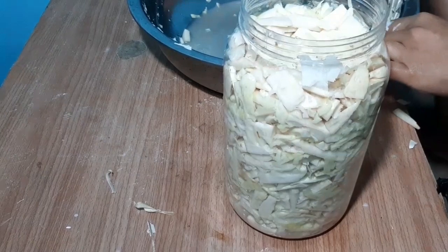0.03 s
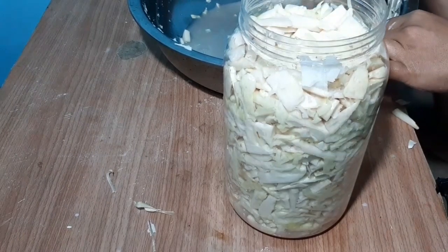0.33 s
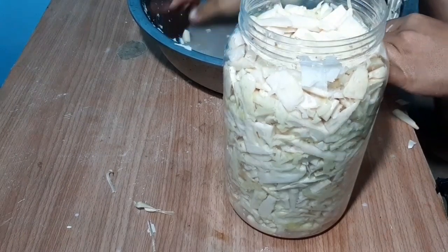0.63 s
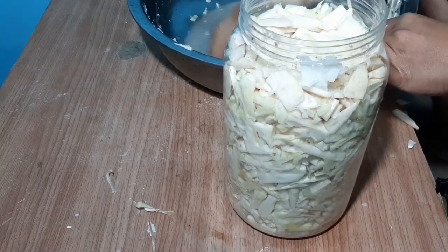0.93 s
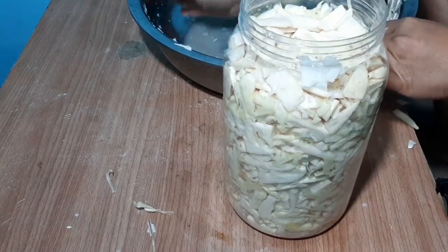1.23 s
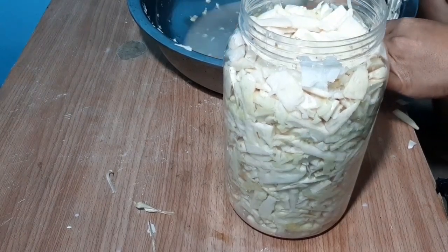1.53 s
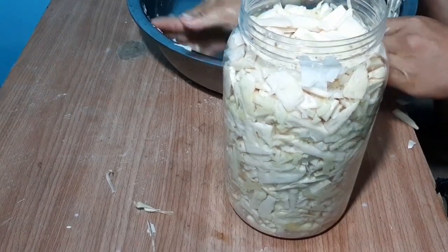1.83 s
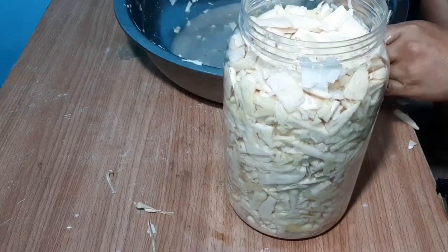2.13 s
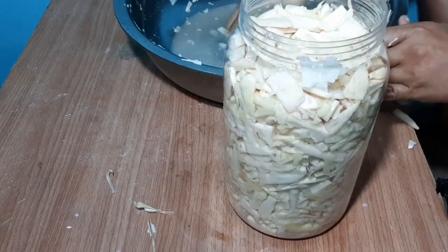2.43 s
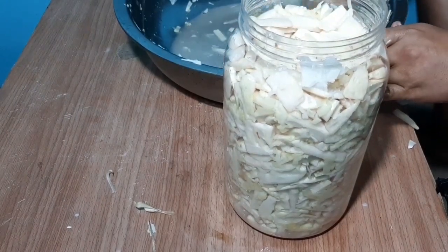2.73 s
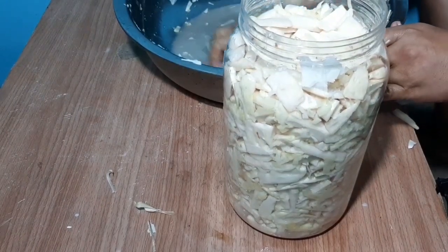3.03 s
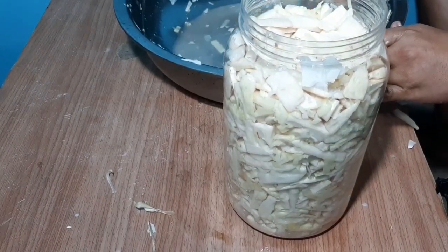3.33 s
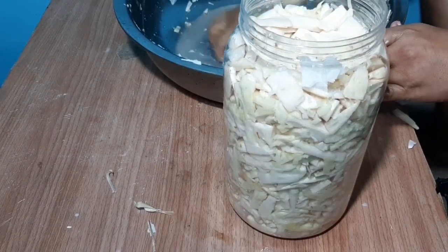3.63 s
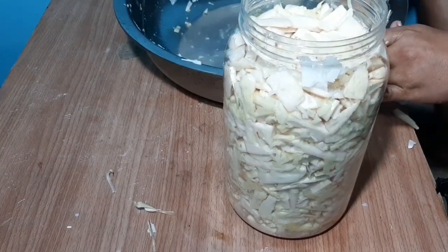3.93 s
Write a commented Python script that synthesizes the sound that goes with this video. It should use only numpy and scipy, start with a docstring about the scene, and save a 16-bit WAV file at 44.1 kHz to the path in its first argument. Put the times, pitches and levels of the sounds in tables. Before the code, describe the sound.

A wet hand sweeps shredded bamboo shoots around a plastic basin in short, raspy strokes with faint squeaks and crackles. Midway the basin knocks once on a wooden table, then rubbing and finger taps continue, close by in a small kitchen.

```python
"""A wet hand sweeps shredded bamboo shoots together in a plastic basin.
The strokes rasp as the shreds slip and tiny air pockets pop; wet skin sticks and slips on the plastic
and half squeaks. Shreds snap and drip, fingers bump the basin, and once it knocks on the wooden table.
Behind it all is a small kitchen with a short echo and a low hum."""
import sys
import numpy as np
from scipy import signal
from scipy.fft import rfft, irfft
from scipy.io import wavfile

SR = 44100
rng = np.random.default_rng(int(sys.argv[2]) if len(sys.argv) > 2 else 0)


def int16_out(signal):
    """Quantize to a 16-bit WAV file."""
    q = np.round(np.clip(np.atleast_2d(signal).T, -1, 1) * 32767)
    wavfile.write(sys.argv[1], SR, q.astype(np.int16))


N = 176400
T = np.arange(N) / SR


def hand_strokes():
    """Wet shreds dragged over the basin: many tiny slips and pops blend into a shaky rasp."""
    # one sweep a row: start/s, length/s, level/dB, rise/s, fade/s, drop over the length/dB,
    # low edge/Hz, brightness/(dB per octave)
    sweeps = [(0.081, 0.1, -31.5, 0.076, 0.041, 3.5, 1800, 3),
              (0.221, 0.075, -29, 0.057, 0.065, 4, 1450, -1), (0.617, 0.093, -51, 0.027, .03, 2, 3600, 1),
              (0.726, 0.2, -31.5, 0.094, 0.012, 4, 1760, 2), (0.918, 0.052, -41, 0.014, .03, 7, 900, -4.5),
              (1.258, 0.19, -53, 0.028, 0.027, -0.5, 2800, -0.5),
              (1.418, .15, -44.5, 0.034, .04, 4.5, 2500, 1.5),
              (1.59, 0.081, -50, 0.045, 0.0063, -4.5, 2800, -2),
              (1.896, 0.14, -31, 0.15, 0.01, 1, 1190, -1), (2.023, 0.11, -34, 0.0095, 0.047, 0.5, 690, -2),
              (2.176, 0.17, -42.5, 0.099, 0.012, 6, 1500, 0.5),
              (2.569, 0.17, -37, 0.079, 0.086, 6, 350, -1), (3.051, 0.24, -32.5, .06, 0.081, 5, 1080, -2.5),
              (3.627, 0.18, -30, .1, 0.12, 9.5, 1300, -2), (3.815, 0.045, -42, 0.028, 0.05, -4, 500, -2),
              (3.903, 0.11, -36.5, 0.092, .03, 4.5, 550, -1.5)]
    # tone colour of the rubbing: f/Hz, level/dB
    rasp_colour = [(200, -32), (600, 8.5), (1000, -5), (1600, 1.5), (2200, -2.5), (3200, -1), (4000, 1),
                   (4900, 0.5), (7000, -6), (9000, -10.5), (13000, -16), (14000, -18), (16000, -23)]
    slips = rms_one(random_clicks(per_s=3500, spread_db=-1, max_spreads=4))
    rasp = rms_one(flicker(slips + 0.84 * rng.standard_normal(N)))
    judder = from_db(1.4 * drift(rate_hz=51))
    friction = (rasp + 0.3 * air_pockets()) * judder
    out = np.zeros(N)
    for start, length, db, rise, fade, drop_db, edge_hz, tilt_db in sweeps:
        t = T - start
        swell = np.sin(np.pi / 2 * np.clip(t / rise, 0, 1)) ** 2
        release = np.exp(-np.maximum(t - length, 0) / fade)
        level = from_db(db - drop_db * np.clip(t / length, 0, 1))
        rub = rms_one(butter(coloured(friction, rasp_colour, tilt_db), edge_hz, "high"))
        out += swell * release * level * rub
    return out


def air_pockets():
    """Tiny air pockets pop between the wet shreds, each ringing briefly at its own pitch."""
    pitches_hz = np.geomspace(1108, 9020, num=48)
    ring_cycles = 138  # swings until a pop has faded by 60 dB
    pops = random_clicks(per_s=900, spread_db=4.5, max_spreads=3)
    pitch_of_pop = rng.integers(0, len(pitches_hz), N)
    out = np.zeros(N)
    for k, hz in enumerate(pitches_hz):
        fade = from_db(-60 * hz / (ring_cycles * SR))
        turn = 2 * np.pi * hz / SR
        ring_filter = [turn, 0, -turn], [1, -2 * fade * np.cos(turn), fade * fade]
        out += signal.lfilter(*ring_filter, pops * (pitch_of_pop == k) + 1e-18)
    return rms_one(out)


def skin_squeaks():
    """Wet skin sticks and slips on the plastic: hoarse, sliding tones with two overtones."""
    # one squeak a row: start/s, length/s, first pitch/Hz, last pitch/Hz, level/dB,
    # hoarse width/Hz, change per overtone/dB
    squeaks = [(0.16, 0.05, 1950, 1872, -34, 90, -16), (0.161, 0.088, 1780, 1694, -42.5, 50, 1),
               (0.259, 0.1, 1600, 1568, -41, 60, -2), (0.759, 0.035, 2390, 2674, -32, 39.7, -5),
               (0.829, 0.091, 1720, 1704, -49, 69.6, 0.5), (0.881, 0.044, 3480, 3460, -36, 110, -10),
               (0.981, 0.032, 1650, 2140, -44.5, 60, -7.5), (1.656, 0.021, 3690, 3600, -41, 131, -10),
               (2.305, 0.029, 3400, 3265, -37.5, 198, -3), (3.094, 0.036, 1320, 1316, -29.5, 60.3, -8),
               (3.113, .11, 1704, 1506, -37.5, 70, -2.5), (3.198, .09, 1480, 1415, -43, 70, -0.5),
               (3.709, 0.028, 1640, 1643, -29.5, 70, -3), (3.689, 0.096, 1474, 1434, -42, 60, 2),
               (3.747, 0.079, 1680, 1409, -36, 80, -1.5)]
    out = np.zeros(N)
    for start, length, first_hz, last_hz, db, width_hz, overtone_db in squeaks:
        progress = np.linspace(0, 1, int(length * SR))
        phase = 2 * np.pi * np.cumsum(first_hz + (last_hz - first_hz) * progress) / SR
        for k in (1, 2, 3):
            # slow noise shakes the tone and makes it hoarse
            shake = butter(rng.standard_normal((2, SR // 2)), width_hz * np.sqrt(k), "low")
            shake = shake[:, SR // 8:SR // 8 + len(progress)]
            tone = rms_one(shake[0] * np.cos(k * phase) + shake[1] * np.sin(k * phase))
            add(out, start, from_db(db + (k - 1) * overtone_db) * np.sin(np.pi * progress) * tone)
    return butter(out, 5000, "low")


def shred_snaps():
    """Shreds snap and drip: each is a very short wet crackle with one ringing pitch."""
    # one snap a row: t/s, level/dB, ring pitch/Hz, ring strength/ratio, low edge/Hz, fade/s
    snaps = [(0.05, -39.5, 4450, .6, 3620, 0.018), (0.182, -31, 3480, 1.2, 1700, 0.0099),
             (0.301, -30.5, 3080, 1.1, 2000, .004), (0.395, -32.5, 4840, 2.1, 3750, 0.0072),
             (0.397, -35.5, 2210, 3.2, 7000, 0.0052), (0.613, -39, 4100, 1.05, 3670, 0.013),
             (0.671, -39.5, 5000, 0.9, 3730, 0.018), (0.698, -44.5, 3830, 1.2, 3500, .008),
             (0.756, -39.5, 5000, 1.6, 3200, .008), (0.851, -30.5, 4900, 1.2, 3500, 0.011),
             (1.455, -30.5, 4800, 1.34, 1990, 0.0056), (1.458, -38, 2030, 2.3, 1500, .006),
             (1.602, -43.5, 4050, 1.8, 2980, 0.0059), (2.27, -36.5, 3660, 0.57, 600, 0.003),
             (2.317, -35, 3300, 0.54, 3400, 0.0068), (2.398, -43, 1730, 1.1, 400, 0.0051),
             (2.569, -44.5, 1490, 1.8, 400, 0.011), (2.596, -49, 6260, 1.3, 4000, 0.0042),
             (2.654, -44, 5000, 1.2, 3000, 0.0032), (2.694, -32.5, 1650, 0.59, 500, 0.013),
             (2.727, -36.5, 2520, 1.15, 1200, 0.007), (2.738, -28, 1610, 0.26, 1200, 0.0042),
             (2.779, -39, 4500, 1.1, 3000, 0.011), (3.082, -33.5, 3100, 0.7, 1490, 0.012),
             (3.178, -36.5, 3340, 2.2, 2500, 0.0037), (3.228, -25.5, 4760, 0.85, 700, 0.0033),
             (3.295, -25, 2630, .6, 800, 0.0055), (3.441, -45.5, 1400, 2.4, 600, 0.0065),
             (3.723, -30, 3270, 0.61, 2000, 0.0062), (3.852, -38, 4020, 1, 2500, .006)]
    rise_s, ring_width_hz = 0.0013, 450
    out, t = np.zeros(N), T[:8192]
    for start, db, ring_hz, ring_strength, edge_hz, fade in snaps:
        hiss = butter(rng.standard_normal(len(t)), edge_hz, "high")
        crackle = rms_one(butter(hiss, 6630, "low"))
        ring = noise_band(ring_hz - ring_width_hz / 2, ring_hz + ring_width_hz / 2)
        shape = np.minimum(t / rise_s, 1) * np.exp(-np.maximum(t - rise_s, 0) / fade)
        add(out, start, from_db(db) * shape * (crackle + ring_strength * ring))
    return butter(out, 9100, "low", order=1)


def finger_bumps():
    """Fingers bump the basin: soft thuds that die quickly, with a little scuff."""
    # one bump a row: t/s, level/dB, f/Hz, time to fade by 60 dB/s
    bumps = [(0.075, -25, 135.8, 0.25), (0.082, -28.5, 262, 0.048), (0.179, -29, 305, 0.045),
             (0.399, -32.5, 327, 0.046), (1.843, -30.5, 137, 0.3), (1.894, -30, 136, 0.28),
             (2.269, -29, 130.6, 0.17), (2.397, -20.5, 386, 0.015), (2.569, -20.5, 183, 0.052),
             (2.571, -37, 600, 0.1), (2.618, -35.5, 640, 0.092), (2.635, -24.5, 270, 0.043),
             (2.658, -27.5, 370, 0.04), (2.693, -19.5, 340, 0.021), (2.728, -20.5, 367, 0.02),
             (3.015, -30.5, 140, .12), (3.226, -15, 760, 0.022), (3.227, -22, 317, 0.029),
             (3.293, -17, 688, 0.025), (3.297, -16.5, 1044, .025), (3.44, -30.5, 710, 0.03),
             (3.613, -25.5, 247, 0.075), (3.615, -34.5, 76.4, 0.23)]
    rise_s = 0.0025
    out, t = np.zeros(N), T[:8192]
    for start, db, hz, ring_s in bumps:
        scuff = butter(noise_band(hz / 2, hz * 2), 2 * hz, "low")
        thud = np.sin(2 * np.pi * hz * t) + 0.29 * scuff
        add(out, start, from_db(db - 60 * t / ring_s) * np.minimum(t / rise_s, 1) * thud)
    return out


def basin_knock():
    """The basin scuffs, lands and rocks on the table: each touch cracks and sets it ringing."""
    # one touch a row: t/s, crack level/dB, crack centre/Hz, thud level/dB
    touches = [(2.015, -28, 4500, -31), (2.0199, -10.5, 3860, -22), (2.025, -21, 3300, -36),
               (2.0287, -17.5, 1820, -26), (2.044, -36, 4000, -25.5), (2.0502, -40, 694, -24),
               (2.0764, -39, 1800, -24)]
    # tones of the basin on the table: f/Hz, level/dB, time to fade by 60 dB/s
    basin_tones = [(114, -15, .13), (132.3, 1, 0.16), (158.6, -1, 0.12), (199, -2, 0.07), (258, -4.5, .15),
                   (406, -14, .05), (671, -13, 0.095), (760, -14, 0.11), (1070, -14, 0.07),
                   (2050, -8, 0.23), (2140, -18.5, .26), (2692, -23, .15), (3050, -15, .1),
                   (4750, -19, .22)]
    rise_s, fade_s, width_ratio = 0.0003, 0.0048, 1.34
    out, t = np.zeros(N), T[:SR]
    crack_shape = np.minimum(t / rise_s, 1) * np.exp(-t / fade_s)
    for start, crack_db, crack_hz, thud_db in touches:
        bright = noise_band(crack_hz / width_ratio, crack_hz * width_ratio, size=SR)
        crack = butter(bright, 6630, "low") + 0.48 * noise_band(200, 800, size=SR)
        thud = sum(from_db(db + rng.normal(0, 1) - 60 * t / ring_s) * np.sin(2 * np.pi * hz * t)
                   for hz, db, ring_s in basin_tones)
        add(out, start, from_db(crack_db) * crack * crack_shape + from_db(thud_db) * thud)
    return butter(out, 87, "high")


def kitchen_echo(sound):
    """The small room answers with a short, slightly dull wash of echoes."""
    echo_db, delay_s, ring_s = -14, 0.008, 0.51
    t = T[:SR]
    dull_noise = butter(rng.standard_normal(SR), 6400, "low", order=1)
    tail = dull_noise * from_db(-60 * t / ring_s) * (t > delay_s)
    return from_db(echo_db) * signal.fftconvolve(sound, tail / np.linalg.norm(tail))[:N]


def kitchen_hum():
    """A low rumble with faint hiss, and two wavering hum tones."""
    # tone colour of the rumble and hiss: f/Hz, level/dB
    rumble_colour = [(25, -19), (40, -4.5), (58, -8), (75, 0), (100, -0.5), (135, 3), (195, 0), (250, -3.5),
                     (450, -10.5), (650, -10), (1000, -16.5), (1800, -21), (2500, -26.5), (3500, -24),
                     (5700, -30.5), (6900, -22.5), (8500, -35), (15500, -38.5)]
    # their slowly changing loudness: t/s, level/dB
    rumble_levels = [(0, -40.5), (1.3, -42.5), (1.9, -42.5), (2.5, -42.5), (2.8, -43.5), (3.5, -43),
                     (4, -44)]
    level = from_db(np.interp(T, *np.transpose(rumble_levels)))
    out = level * coloured(rng.standard_normal(N), rumble_colour)
    for hz, db in (74, -51), (133.5, -49.5):
        waver = drift(rate_hz=1) + 1j * drift(rate_hz=1)  # moves both loudness and pitch
        out += from_db(db) * rms_one(np.real(waver * np.exp(2j * np.pi * hz * T)))
    return out


def flicker(x, depth_db=2.5, rate_hz=21):
    """Let every quarter octave of a sound swell and fade by itself."""
    band_position = 4 * np.log2(np.clip(np.fft.rfftfreq(N, 1 / SR), 500, 16000) / 500)
    spectrum, out = rfft(x), np.zeros(N)
    for k in range(21):
        band = irfft(spectrum * np.maximum(1 - abs(band_position - k), 0), N)
        out += band * from_db(depth_db * np.clip(drift(rate_hz), -2, 2))
    return out


def random_clicks(per_s, spread_db, max_spreads):
    """Clicks at random times and of random strength."""
    clicks = (rng.random(N) < per_s / SR) * rng.choice([-1, 1], N)
    return clicks * from_db(spread_db * np.minimum(rng.exponential(1, N), max_spreads))


def from_db(db):
    """Turn decibels into a number to multiply by."""
    return 10 ** (np.asarray(db) / 20)


def rms_one(x):
    """Scale a sound to an average strength (rms) of 1."""
    return x / np.sqrt(np.mean(x ** 2) + 1e-20)


def butter(x, hz, kind, order=2):
    """Filter a sound, keeping its "low" part, its "high" part or a "band"."""
    sections = signal.butter(order, np.clip(hz, 10, .45 * SR), kind, fs=SR, output="sos")
    return signal.sosfilt(sections, x)


def coloured(x, colour, tilt_db=0):
    """Give a sound a tone colour, brighter by tilt_db each octave; strength 1."""
    octave = np.log2(np.maximum(np.fft.rfftfreq(len(x), 1 / SR), 1))
    hz, db = np.transpose(colour)
    gain = from_db(np.interp(octave, np.log2(hz), db) + tilt_db * octave)
    return rms_one(irfft(rfft(x) * gain, len(x)))


def drift(rate_hz):
    """A smooth random wobble of strength 1."""
    smoothing = 1 + (np.fft.rfftfreq(N, 1 / SR) / rate_hz) ** 2
    return rms_one(irfft(rfft(rng.standard_normal(N)) / smoothing, N))


def noise_band(low_hz, high_hz, size=8192):
    """A short piece of noise, mostly between two pitches; strength 1."""
    return rms_one(butter(rng.standard_normal(size), [low_hz, high_hz], "band", order=1))


def add(out, start_s, sound):
    """Mix a sound in at a given time."""
    i = int(np.clip(start_s * SR, 0, N - 1))
    out[i:i + len(sound)] += sound[:N - i]


def scene():
    """Hand and basin in the kitchen, the same on the left and the right."""
    basin = hand_strokes() + skin_squeaks() + shred_snaps() + finger_bumps() + basin_knock()
    return np.tile(basin + kitchen_echo(basin) + kitchen_hum(), (2, 1))


def record(dry):
    """Cut off the very highest treble steeply."""
    top_hz = 15750
    return signal.sosfilt(signal.ellip(12, .1, 90, top_hz, fs=SR, output="sos"), dry)


dry = scene()
out = record(dry)
int16_out(out)
```